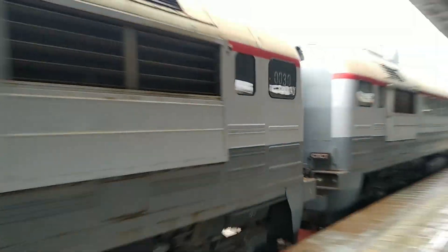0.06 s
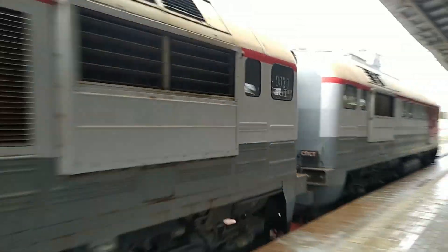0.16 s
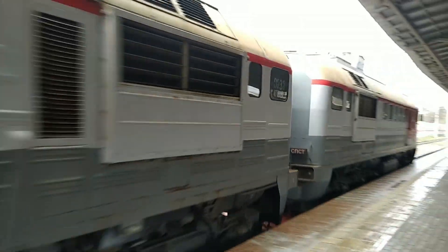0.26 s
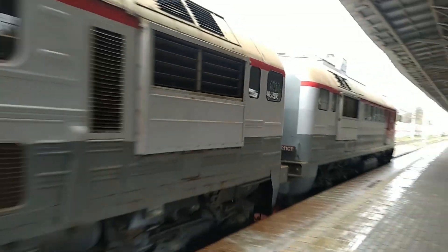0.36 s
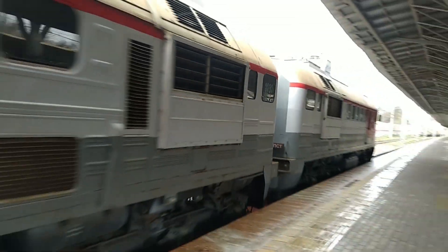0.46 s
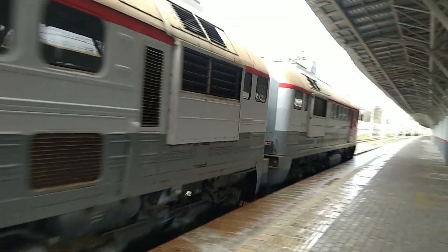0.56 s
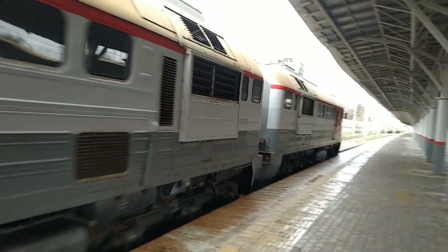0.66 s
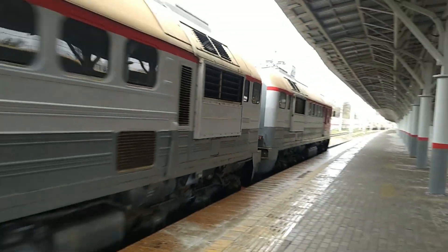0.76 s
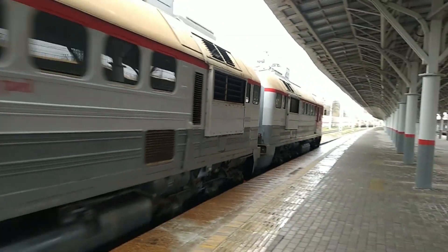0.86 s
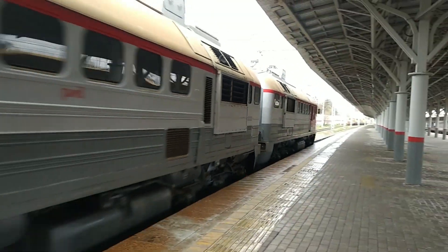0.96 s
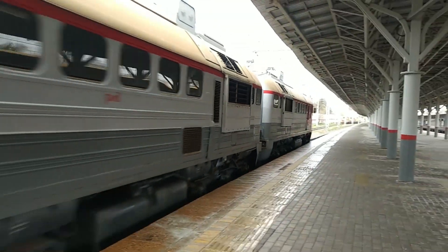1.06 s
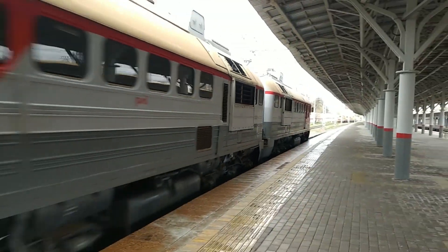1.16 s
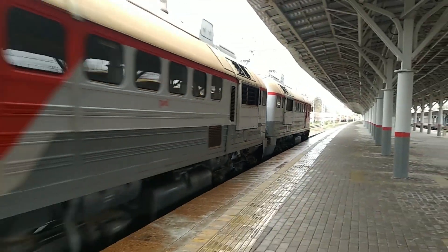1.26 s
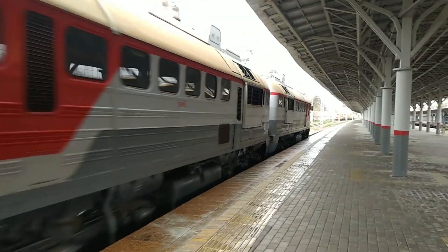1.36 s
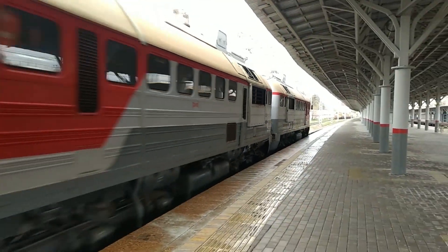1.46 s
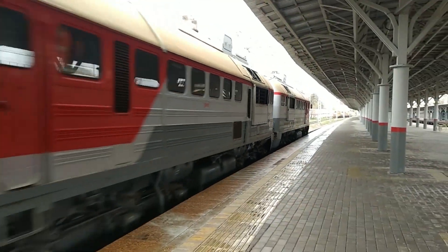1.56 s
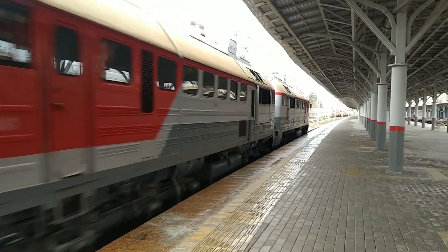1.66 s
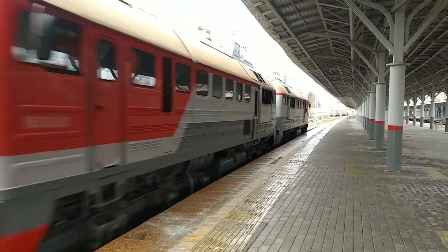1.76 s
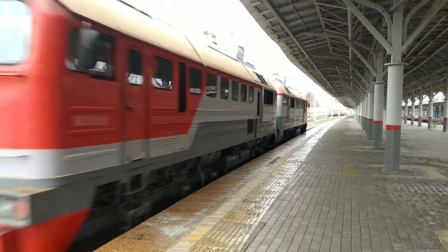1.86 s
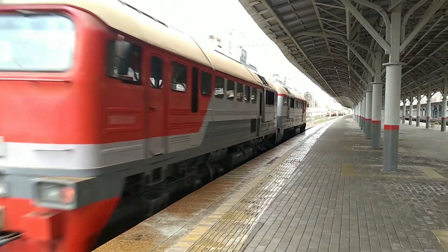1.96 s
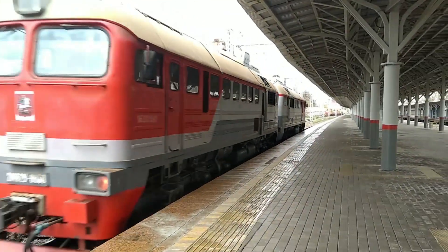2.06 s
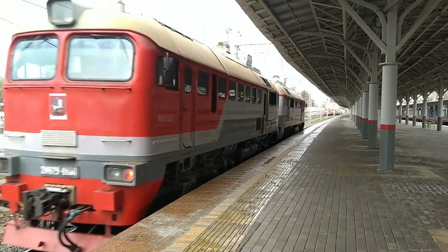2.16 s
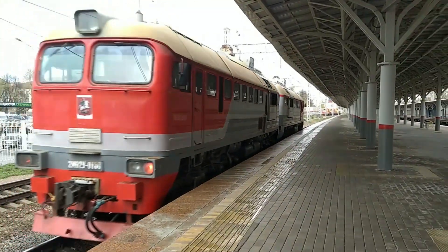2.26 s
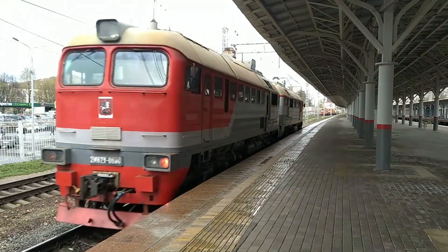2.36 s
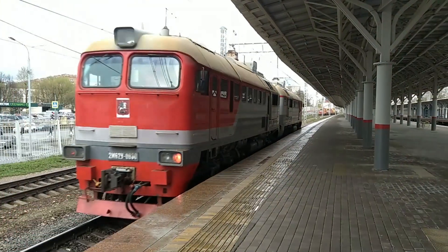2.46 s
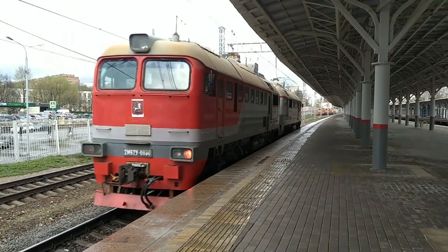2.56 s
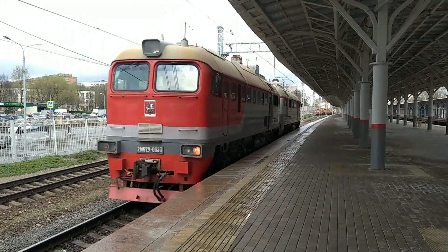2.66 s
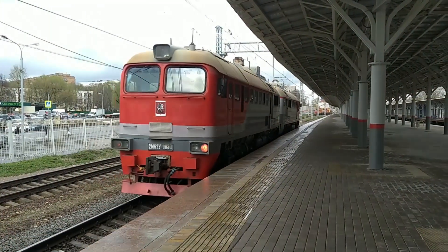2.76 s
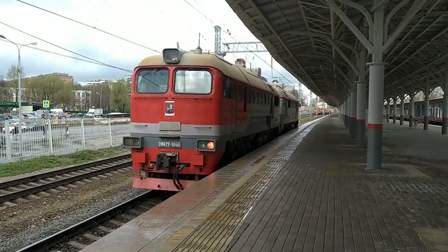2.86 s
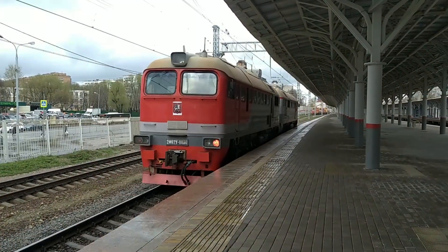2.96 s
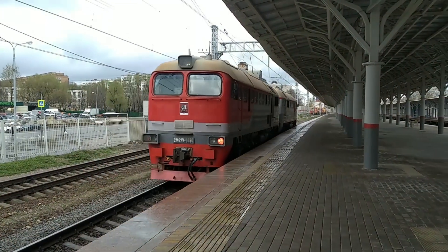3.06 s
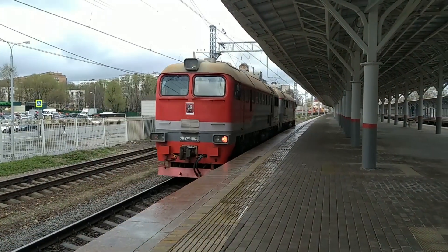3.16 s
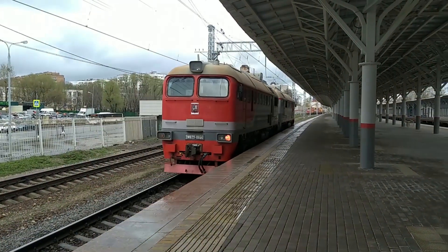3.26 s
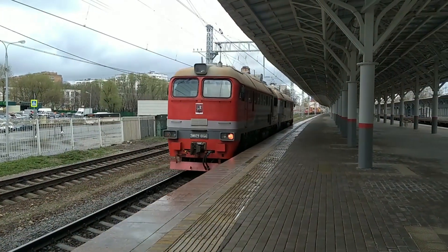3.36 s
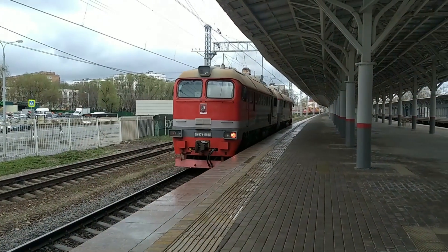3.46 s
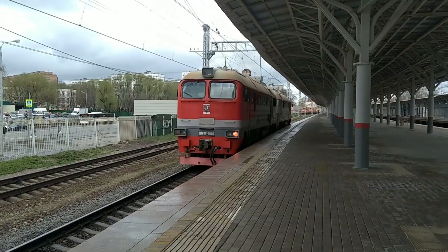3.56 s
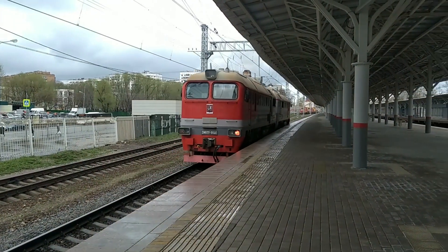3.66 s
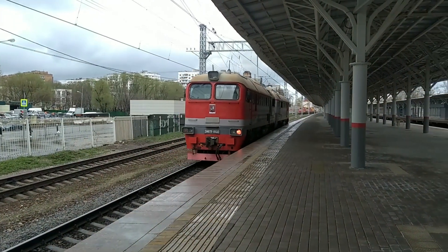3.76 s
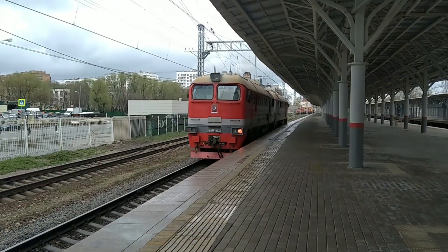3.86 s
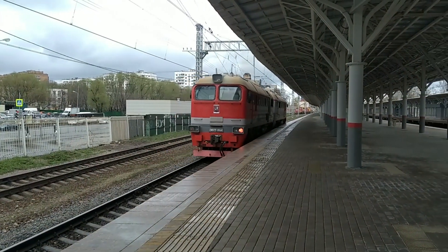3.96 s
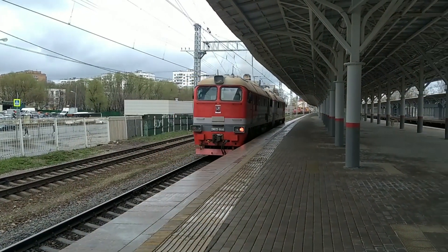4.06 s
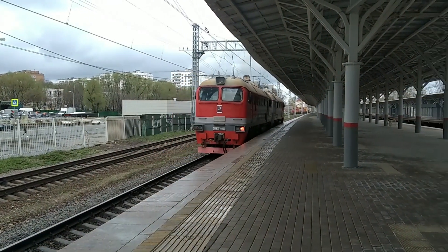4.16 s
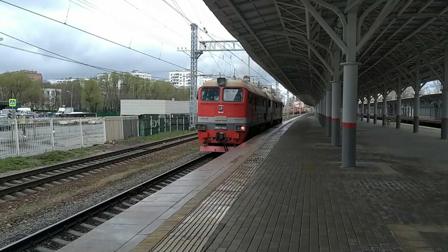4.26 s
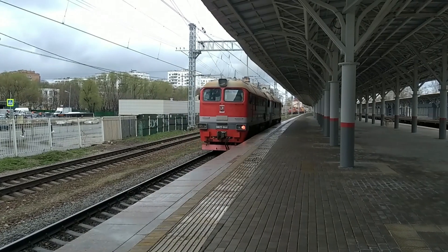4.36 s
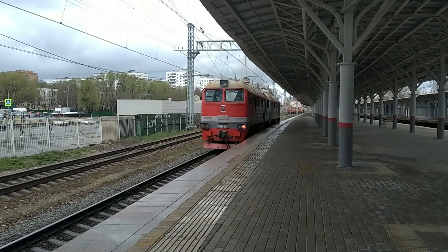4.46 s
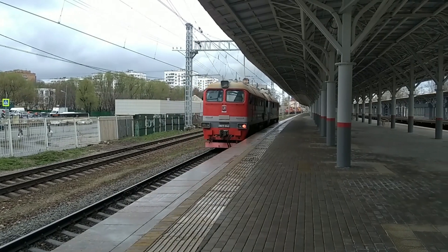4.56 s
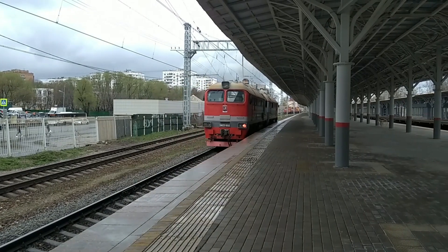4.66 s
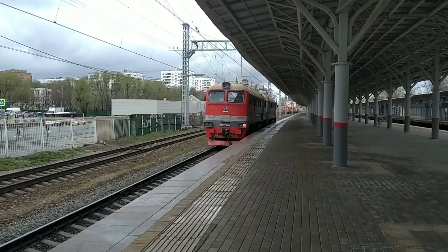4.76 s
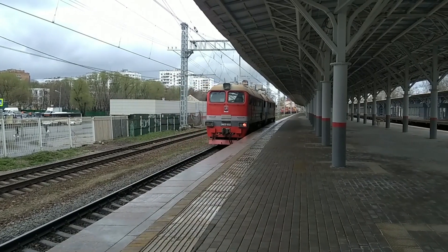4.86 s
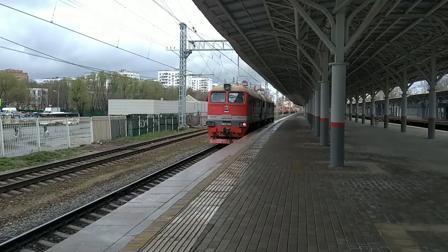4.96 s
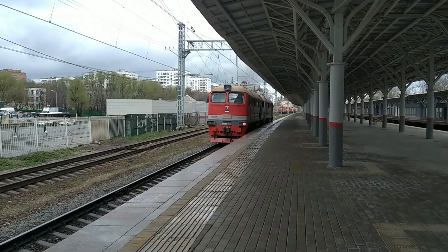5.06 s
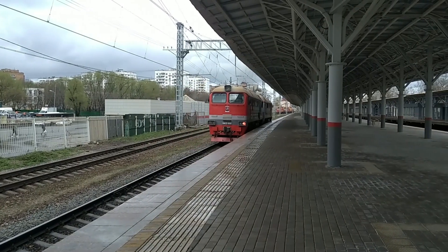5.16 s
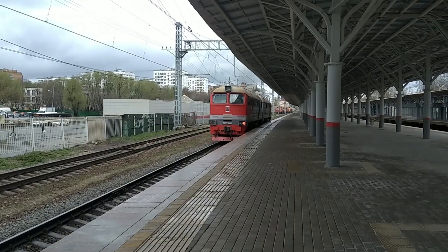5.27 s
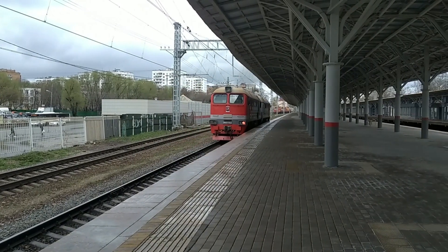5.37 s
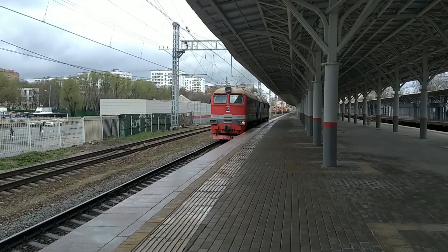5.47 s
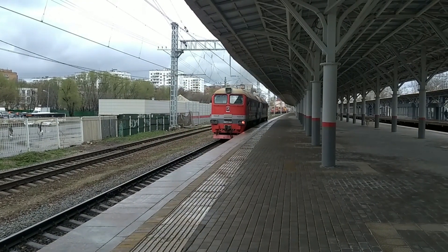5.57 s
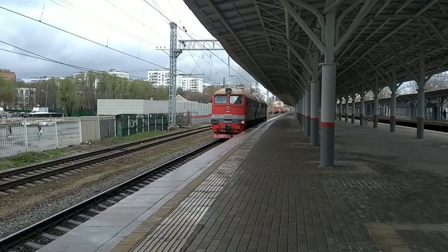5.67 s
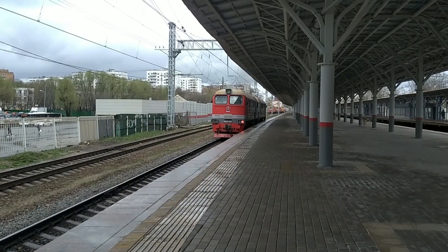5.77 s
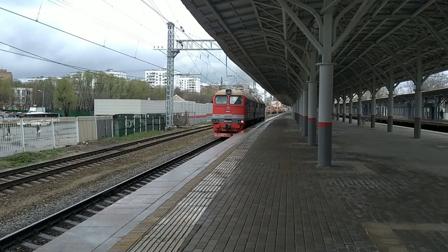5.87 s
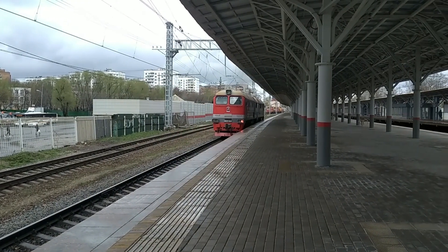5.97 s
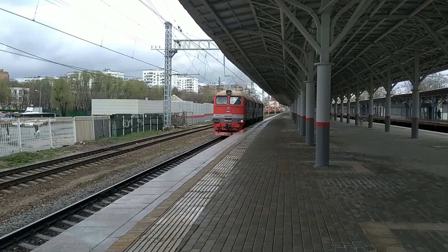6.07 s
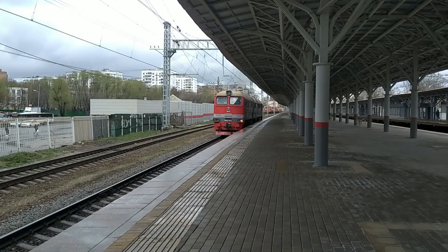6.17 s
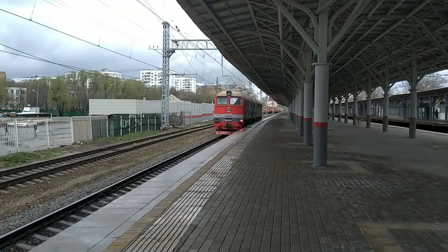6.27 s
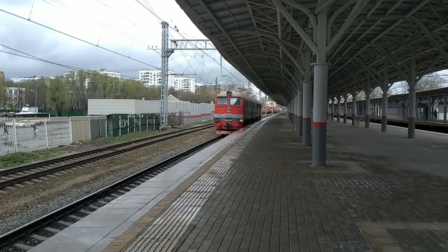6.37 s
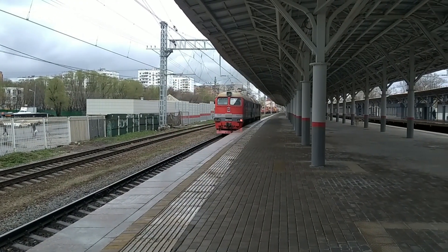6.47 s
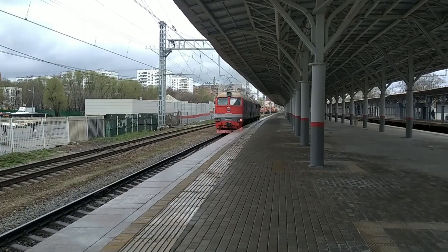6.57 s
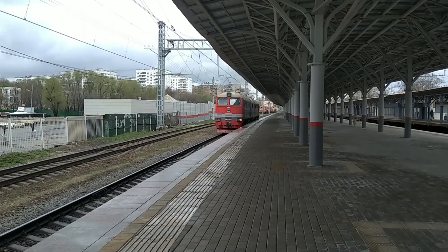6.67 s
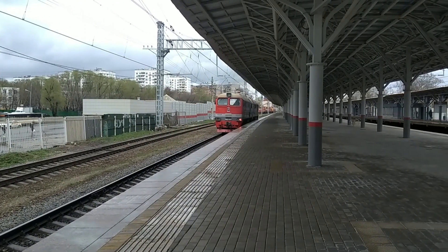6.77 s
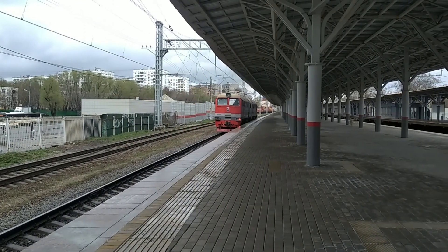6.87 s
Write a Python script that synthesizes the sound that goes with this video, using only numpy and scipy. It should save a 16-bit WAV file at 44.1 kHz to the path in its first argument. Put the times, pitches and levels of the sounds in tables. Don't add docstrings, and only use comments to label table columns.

```python
import sys
import numpy as np
from scipy import signal
from scipy.fft import rfft, irfft, next_fast_len
from scipy.io import wavfile
from scipy.ndimage import uniform_filter1d, map_coordinates

SR = 44100
rng = np.random.default_rng(int(sys.argv[2]) if len(sys.argv) > 2 else 0)


def how_loud(loudness_db):
    steps = np.asarray(loudness_db, float) / 20
    return 10 ** steps


def waveform_to_disk(signal):
    frames = np.transpose(np.atleast_2d(signal))
    scaled = np.clip(frames, -1, 1) * 32767
    samples = np.round(scaled).astype(np.int16)
    wavfile.write(sys.argv[1], SR, samples)


N = 305436
TIME = np.arange(N) / SR


def unit(x):
    return x / np.sqrt(np.mean(x ** 2) + 1e-20)


def along(points, hz, axis=1):
    table = np.transpose(points)
    return np.interp(np.log(hz + 1), np.log(table[0] + 1), table[axis])


def curves(rows):
    s, *columns = np.transpose(rows)
    return [np.interp(TIME, s, column) for column in columns]


def wobble(rate_hz):
    coarse_s = TIME[::64]
    knots = rng.standard_normal(int(N * rate_hz / SR) + 4)
    return np.interp(TIME, coarse_s, map_coordinates(knots, [coarse_s * rate_hz]))


def filtered(x, response):
    size = next_fast_len(N + 8192)
    hz = np.fft.rfftfreq(size, 1 / SR)
    return irfft(rfft(x, size) * response(hz), size)[..., :N]


def band(hz, lo_hz, hi_hz, edge=0.029):
    def rise(at_hz):
        return 0.5 + 0.5 * np.tanh(np.log((hz + 1) / (at_hz + 1)) / edge)
    return np.sqrt(np.clip(rise(lo_hz) - rise(hi_hz), 0, 1))


def rush(patchy_db):
    z = signal.stft(rng.standard_normal(N), nperseg=512)[2]
    field = uniform_filter1d(rng.standard_normal(z.shape), size=5, axis=0)
    field = uniform_filter1d(field, size=8, axis=1)
    return signal.istft(z * how_loud(patchy_db * unit(field)), nperseg=512)[1][:N]


def blows(rows, cycles, grit):
    out = np.zeros(N + SR)
    u = np.arange(SR // 10) / SR
    for s, peak_db, hz in rows:
        shape = hz * u / cycles * np.exp(1 - hz * u / cycles)
        ring = np.sin(2 * np.pi * hz * u) + grit * rng.standard_normal(len(u))
        out[round(s * SR):][:len(u)] += how_loud(peak_db) * shape * ring
    return out[:N]


def bell(s, half_s):
    return np.exp(-((TIME - s) / half_s) ** 2)


def swells(rows):
    return sum(how_loud(peak_db) * bell(s, half_s) for s, peak_db, half_s in rows)


# (time [s], peak [dB], ring [Hz])
JOINT_BLOWS = [
    (4.107, -36, 300),
    (5.156, -35, 200),
    (5.177, -28, 380),
    (5.178, -30, 750),
    (5.18, -33, 540),
    (5.184, -33, 230),
    (5.19, -36, 110),
    (6.785, -39, 130),
    (6.785, -42, 80),
]


def joint_thumps():
    return filtered(blows(JOINT_BLOWS, cycles=0.8, grit=1.2), lambda hz: band(hz, 60, 1100, edge=0.2))


# (time [s], level [dB])
ROAR_DB = [(0, -23), (.5, -22.5), (.95, -23), (1.13, -22.5), (1.45, -25), (1.74, -26), (1.9, -27),
           (2.36, -30), (2.55, -29), (3.0, -29.5), (3.15, -32.5), (3.45, -34), (3.65, -35.5), (4.03, -38),
           (4.35, -36.5), (5.3, -42.5), (6.09, -42), (6.93, -46.5)]
ROAR_ALONGSIDE_DB = -24


def roar_db():
    return curves(ROAR_DB)[0]


def rough_tone(hz, db, rough_rad):
    phase = 2 * np.pi * np.cumsum(hz * np.ones(N)) / SR
    return how_loud(db + 1.97 * wobble(14)) * np.sin(phase + rough_rad * wobble(12))


# (time [s], rate [Hz])
MESH_HZ = [(0, 169.3), (1.5, 173.3), (3.4, 174.1), (5.2, 180.4), (6.93, 182.1)]
# (level alongside [dB], share of roar's fall [0-1], beating [dB])
HUM_LEVELS = [
    (-37, 0.82, 3),
    (-38, 0.61, 2.5),
    (-37.5, 0.73, 2),
    (-35, 0.73, 3),
    (-44.5, 0.95, 3.5),
]
# (time [s], peak [dB], half length [s])
MESH_SWELLS = [
    [(.3, -31.5, 0.27), (.67, -25.5, 0.086), (.84, -31, 0.073), (1.14, -26, 0.039), (1.5, -25.5, 0.096),
     (2.15, -32, 0.26), (2.6, -34.5, 0.15), (3.43, -32, .07), (3.91, -39.5, 0.079), (4.26, -42, 0.11),
     (5.0, -41, .05)],
    [(.2, -32, 0.21), (.67, -31, 0.037), (.84, -26, 0.031), (1.14, -20, 0.083), (1.42, -29.5, 0.21),
     (1.75, -24.5, 0.11), (2.18, -30, 0.028), (2.9, -41, 0.24), (3.4, -44, .08), (4.27, -46, 0.082),
     (4.88, -53, 0.044)],
    [(.45, -40, 0.069), (.83, -26, 0.039), (1.07, -25, 0.034), (1.75, -30, 0.18), (2.89, -31, 0.049),
     (3.45, -40, 0.064), (3.91, -42.5, .07), (4.8, -59, 0.24)],
]
# (time [s], peak [dB], half length [s])
BLADE_SWELLS = [(.23, -41, 0.034), (.92, -25, 0.083), (1.26, -23.5, 0.079), (1.56, -24.5, 0.034),
                (2.75, -38, 0.18), (3.2, -47, .1), (4.186, -40, 0.045), (6.078, -52, 0.049)]
# (frequency [Hz], level re exhaust roar [dB])
FIRING_ORDERS = [(89.5, -7), (118, -14.5)]


def tones():
    mesh_hz, near_db = curves(MESH_HZ)[0], roar_db()
    levels_db = []
    for (db, far, beat_db), rows in zip(HUM_LEVELS, [*MESH_SWELLS, [], BLADE_SWELLS]):
        steady = how_loud(db + far * (near_db - ROAR_ALONGSIDE_DB) + beat_db * wobble(5))
        levels_db.append(20 * np.log10(steady + swells(rows)))
    *gear_db, fan_db = levels_db
    gears = sum(rough_tone(k * mesh_hz, db - 2.5, rough_rad=0.9 + 0.2 * k)
                for k, db in enumerate(gear_db, start=1))
    fifth = rough_tone(5 * mesh_hz, gear_db[3] - 10, rough_rad=2.44)
    fan = rough_tone(6.03 * mesh_hz, fan_db - 3, rough_rad=1.3)
    orders = sum(rough_tone(hz, near_db - 9 + db, rough_rad=2.1) for hz, db in FIRING_ORDERS)
    return gears + fifth + fan + orders


# (time [s], level [dB])
VALVE_DB = [(0, -32.5), (.58, -30.5), (.75, -31.5), (1.1, -30.5), (1.7, -29.5), (1.9, -31), (2.2, -33),
            (2.5, -31.5), (2.8, -32.5), (3.02, -31), (3.17, -35.5), (3.4, -32.5), (3.5, -35.5), (3.95, -38),
            (4.5, -36.5), (4.7, -41), (5.38, -47), (6.93, -51)]


def valve_fall_db():
    return curves(VALVE_DB)[0] + 30


# (frequency [Hz], density [dB per Hz])
STEEL_DB = [(3000, -68), (3650, -27), (3900, -6), (4150, 1.5), (5000, -3), (7000, -11), (8000, -17),
            (8250, -30.5), (8900, -32), (9100, -30), (10000, -34), (12200, -46), (13400, -46), (14300, -61)]
CLIFF_HZ = 8200


def fizz():
    top = filtered(rush(patchy_db=2.4), lambda hz: how_loud(along(STEEL_DB, hz)) * (hz > CLIFF_HZ))
    return how_loud(-62.5 + 0.95 * valve_fall_db() + 7.5) * unit(top)


# (time [s], peak [dB], ring [Hz])
VALVE_CLACKS = [(0.152, -28.5, 4630), (0.9512, -20, 4160), (1.0046, -16, 4100), (1.1817, -16, 4040),
                (1.222, -25, 4580), (1.257, -15, 4000), (1.3344, -16, 4230), (1.735, -14, 4100),
                (2.3403, -17, 4300), (2.392, -18, 4140), (2.4316, -18.5, 4300), (2.4748, -7, 4410),
                (2.501, -24, 4180), (2.5457, -16, 4600), (2.592, -19, 4460), (2.637, -14, 4190),
                (2.672, -33, 4270), (2.894, -45, 4930), (2.9347, -20, 4050), (3.066, -31, 4100),
                (3.3258, -16, 4460), (3.372, -18, 4350), (3.6412, -16, 4060), (3.8479, -13, 3770),
                (4.259, -17.5, 4180), (4.3664, -17, 4290)]


def clatter_db():
    lift = 0.2 * how_loud(-17) * swells([(s, peak_db, 0.016) for s, peak_db, hz in VALVE_CLACKS])
    return 20 * np.log10(how_loud(curves(VALVE_DB)[0]) + lift)


# (time [s], share [0-1])
FIRING_SHARE = [(0, .12), (1, 0.06), (2.1, 0.08), (2.5, 0.18), (3.6, 0.22), (4.7, 0.16), (5.5, 0.08),
                (6.93, 0)]
FIRING_HZ, FIRING_START = 23.1, 0.02


def clatter():
    count = FIRING_HZ * TIME + FIRING_START
    strengths = how_loud(1.1 * rng.standard_normal(int(count[-1]) + 2))
    sizes = strengths[np.floor(count).astype(int) + 1]
    u = count % 1 / 0.1
    burst = unit(sizes * u * np.exp(1 - u))
    share = curves(FIRING_SHARE)[0]
    gate = np.sqrt(1 - share + share * burst ** 2)
    hiss = rush(patchy_db=1.0) * gate * how_loud(0.82 * wobble(12))
    hiss = filtered(hiss, lambda hz: how_loud(along(STEEL_DB, hz)) * (hz < CLIFF_HZ))
    clacks = blows(VALVE_CLACKS, cycles=9.9, grit=2.9)
    clacks = filtered(clacks, lambda hz: how_loud(along(STEEL_DB, hz)))
    return how_loud(clatter_db() + 4.5) * unit(hiss) + how_loud(-9) * clacks


# (frequency [Hz], density [dB per Hz])
BODY_DB = [(30, -33), (60, -17.5), (90, -7), (160, -3.5), (350, -5.5), (600, -7.5), (900, -7),
           (1050, -15.5), (1700, -17), (2100, -28.5), (3600, -33.5), (5500, -30), (7600, -48), (8200, -110)]
LAYER_EDGES_HZ = [0, 220, 570, 990, 2000, 3700, 9000]
# (time [s], body left-right [dB], dull port treble re bright port [dB])
AIM_DB = [(0.0, -0.5, -18.5), (0.83, 1, -19.5), (1.79, -1, -28), (2.3, -1.5, -32.5), (2.9, -2, -33.5),
          (3.5, -3, -34), (4.42, -3, -36.5), (5.35, 0, -30), (6.93, 1, -28)]


def dull_treble():
    def response(hz):
        return how_loud(along(BODY_DB, hz)) * band(hz, *LAYER_EDGES_HZ[-2:], edge=0.16)
    faint = filtered(rush(patchy_db=2.0), response)
    return how_loud(clatter_db() + curves(AIM_DB)[1] + 4) * unit(faint)


# (level alongside [dB], share of roar's fall [0-1], share of clatter's fall [0-1])
ROAR_LAYERS = [
    (-32, 1.05, 0.012),
    (-27.5, 1.054, 0.02),
    (-28, 0.95, .01),
    (-31, 1.046, 0.0086),
    (-43.5, 0.73, 0.28),
]
# (time [s], exhaust [dB], casing and rails [dB], half length [s])
POST_SURGES = [(0.056, 2.5, 2, 0.18), (.65, -3, 0.5, .06), (1.33, 3, -1, 0.044), (1.765, 2.5, 4, 0.015),
               (2.75, 0.5, -1.5, 0.26), (3.028, 2.5, 2, 0.1), (4.25, 0.5, -1, .1), (5.9, 2, -0.5, 0.089)]


def roar():
    pair = np.array([rush(patchy_db=0.7), rush(patchy_db=2.5)])
    swell = wobble(4.2)
    fall_db, turn_db = roar_db() - ROAR_ALONGSIDE_DB, valve_fall_db()
    low_db = sum(low * bell(s, half_s) for s, low, high, half_s in POST_SURGES)
    high_db = sum(high * bell(s, half_s) for s, low, high, half_s in POST_SURGES)
    surges_db = [low_db, 0, 0, high_db, high_db]
    combs_db = [0.28, 0.54, 0.68, 1.86, 7.25]
    edges = zip(LAYER_EDGES_HZ[:-2], LAYER_EDGES_HZ[1:])
    total = 0
    for (db, far, aim), surge_db, comb_db, (lo, hi) in zip(ROAR_LAYERS, surges_db, combs_db, edges):
        layer = filtered(pair, lambda hz: how_loud(along(BODY_DB, hz)) * band(hz, lo, hi))
        level_db = db + far * fall_db + aim * turn_db + surge_db + comb_db
        total = total + how_loud(level_db + 0.3 * swell + 0.95 * wobble(20)) * unit(layer)
    return total


# (frequency [Hz], left-right [dB], left lead [rad], likeness [0-1])
PORT_PAIR = [(60, -3.7, -0.15, 0.92), (130, -4.5, 0.04, 0.87), (300, 1.0, 0.71, 0.91),
             (650, 2.5, -0.35, 0.89), (900, 2.0, 0.22, 0.8), (1000, 0.5, 0.39, 0.61),
             (1250, -1.7, 0.1, 0.66), (1420, -3.2, 0.66, 0.3), (1720, -2.0, 1.46, 0.9),
             (2000, -1.7, 1.99, 0.57), (2550, -1.2, 2.1, 0.86), (2950, -1.6, 2.48, 0.68),
             (3400, -0.4, 3.11, 0.95), (3650, -0.7, 3.13, 0.91)]


def ports(direct, scattered):
    def spread(hz):
        return np.arccos(np.clip(along(PORT_PAIR, hz, axis=3), 0, 1)) / 2

    def skew(hz):
        return how_loud(along(PORT_PAIR, hz) / 2) * np.exp(0.5j * along(PORT_PAIR, hz, axis=2))
    same = filtered(direct, lambda hz: np.cos(spread(hz)) * [skew(hz), 1 / skew(hz)])
    return same + filtered(scattered, lambda hz: np.sin(spread(hz)) * [skew(hz), -1 / skew(hz)])


def scene():
    direct, scattered = roar()
    swing_db = curves(AIM_DB)[0] / 2
    body = ports(direct + tones() + joint_thumps(), scattered) * how_loud([swing_db, -swing_db])
    return body + [dull_treble(), clatter() + fizz()]


def patch_power(z, bins):
    power = uniform_filter1d(abs(z) ** 2, size=bins, axis=-2)
    return uniform_filter1d(power, size=3, axis=-1) + 1e-20


# (frequency [Hz], left share [0-1], right share [0-1])
LOST_SHARE = [(3300, 0, 0), (4500, .2, 0), (6500, .5, 0), (8000, .7, .03), (8250, 1, .75), (9000, 1, .8),
              (9150, 1, .45), (10500, 1, .6), (11500, 1, .78), (14300, 1, .9)]


def lose_weak_patches(x):
    hz, s, z = signal.stft(x, SR, nperseg=1024)
    mid, side = (z[0] + z[1]) / 2, (z[0] - z[1]) / 2
    masked_db = -7 + 1.6 * np.minimum(np.interp(s, TIME, curves(AIM_DB)[0]), 0)
    mid = mid * (patch_power(mid, 6) > patch_power(side, 6) * how_loud(2 * masked_db))
    z = np.array([mid + side, mid - side])
    power = patch_power(z, 2)
    margin = power / uniform_filter1d(power, size=40, axis=2)
    rank = margin.argsort(axis=2).argsort(axis=2) / margin.shape[2]
    share = np.array([along(LOST_SHARE, hz, axis=1), along(LOST_SHARE, hz, axis=2)])
    return signal.istft(z * (rank >= share[..., None]), SR, nperseg=1024)[1][:, :N]


def top_cut(x):
    return signal.sosfilt(signal.butter(12, 14230, fs=SR, output="sos"), x)


def record(dry):
    mix = lose_weak_patches(dry)
    return top_cut(mix)


dry = scene()
out = record(dry)
waveform_to_disk(out)
```